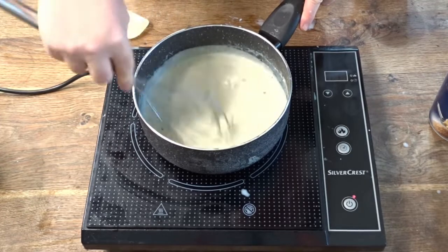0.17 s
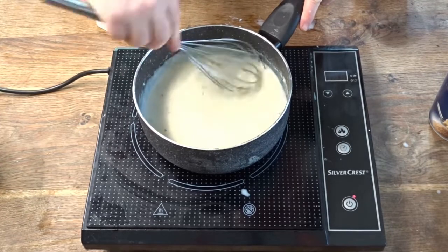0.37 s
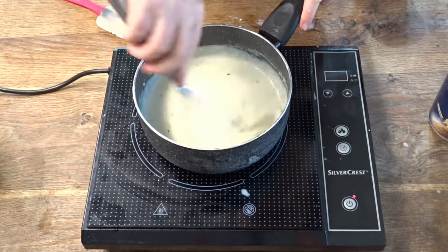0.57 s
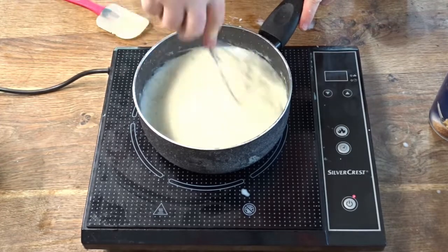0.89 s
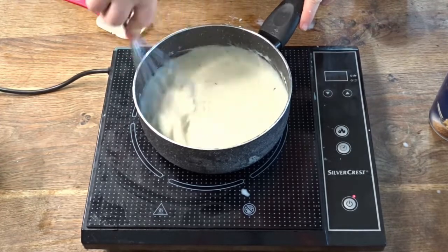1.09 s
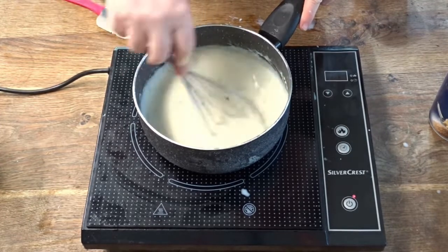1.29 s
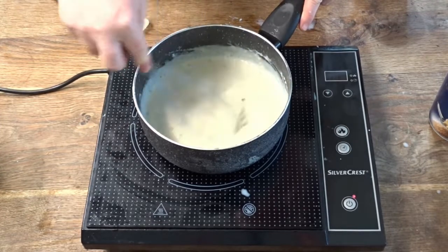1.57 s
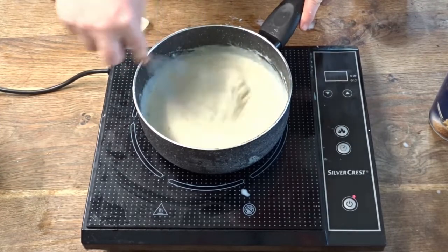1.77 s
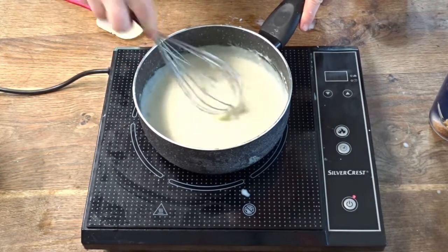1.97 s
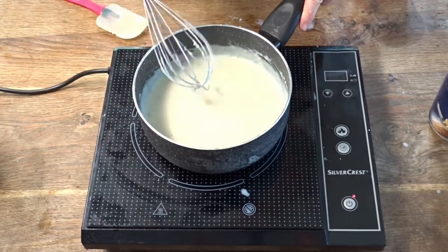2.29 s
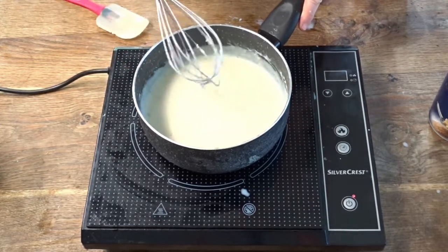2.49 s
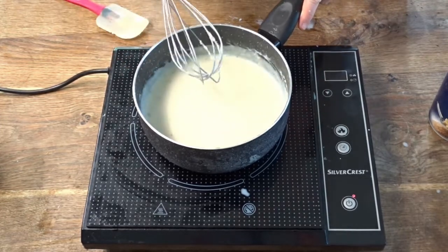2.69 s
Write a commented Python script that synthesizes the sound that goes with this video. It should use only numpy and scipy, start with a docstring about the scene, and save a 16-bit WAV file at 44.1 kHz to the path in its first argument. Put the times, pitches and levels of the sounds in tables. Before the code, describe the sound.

A wire whisk stirs thick sauce in a small saucepan: light strokes, a hard scrape with soft glugs, then quick strokes. It lifts out and taps the rim three times, close by, over a faint kitchen hob hum.

```python
"""Over the hum of a hob, a wire whisk stirs thick sauce in a small saucepan. Light strokes come first,
then a hard scrape round the wall with the sauce glugging, then quick strokes, with the odd knock on the
rim. Each stroke is a run of tiny slips that ring the pan and the wires. The whisk lifts out, singing
faintly, and taps the rim three times. The kitchen adds a short tail throughout."""
import sys
import numpy as np
from scipy import signal
from scipy.fft import rfft, irfft
from scipy.io import wavfile
from scipy.ndimage import map_coordinates

SR = 44100
rng = np.random.default_rng(int(sys.argv[2]) if len(sys.argv) > 2 else 0)


def master_out(mix):
    """Clip the mix to full scale and print it as 16-bit PCM to the path in sys.argv[1]."""
    frames = np.transpose(np.atleast_2d(mix))
    ceiling = np.clip(frames, -1, 1)
    pcm = np.round(ceiling * 32767).astype(np.int16)
    wavfile.write(sys.argv[1], SR, pcm)


N = 125685
T = np.arange(N) / SR

# bed of hob fan and room tone: f/Hz, level/dB
FAN_EQ = [(20, -21), (45, -15), (70, -2.5), (140, -5), (210, -3), (400, -3), (680, -4), (1000, -7),
          (1300, -9.5), (1750, -15), (2100, -4), (2600, -16.5), (4200, -17), (8000, -22), (11000, -24.5),
          (15500, -30)]
# light strokes: peak t/s, rise/s, fall/s, pan level/dB, rasp level/dB, wire level/dB
LIGHT_STROKES = [(.052, 0.11, 0.024, -29.5, -36.5, -39), (0.152, 0.015, 0.0066, -20.5, -35, -42),
                 (0.173, 0.042, 0.023, -45, -30, -33.5), (.258, 0.019, 0.031, -30, -31, -45),
                 (0.304, 0.02, 0.015, -31, -30, -37), (0.385, 0.0058, 0.0041, -38.5, -39, -38),
                 (1.352, .035, 0.028, -33, -39, -42), (1.39, 0.011, 0.0029, -32.5, -34, -35.5),
                 (1.49, 0.038, 0.017, -27.5, -33.5, -40.5), (1.596, 0.027, 0.019, -29, -37, -34.5),
                 (1.693, 0.034, 0.031, -28.5, -28, -39), (1.795, 0.023, 0.018, -25, -29, -32),
                 (1.887, 0.027, 0.023, -28, -35.5, -36), (1.96, .03, 0.1, -51, -55.5, -60)]
# hard scrape round the wall: t/s, pan level/dB, rasp level/dB, wire level/dB
WALL_SCRAPE = [(0.446, -78, -64, -53), (0.457, -41.5, -41, -33), (0.494, -35.5, -41, -42),
               (0.518, -51, -35, -37), (.546, -37, -30.5, -29), (.551, -33, -27, -23),
               (.59, -23, -28.5, -24), (0.628, -31, -30, -19.5), (0.684, -31.5, -32, -21),
               (.72, -31, -27.5, -22.5), (0.788, -33, -24.5, -25), (.846, -33, -51, -31),
               (0.87, -58, -35, -38), (0.891, -31, -28, -17.5), (0.916, -38, -43, -36.5),
               (0.999, -30.5, -38, -30.5), (1.04, -31, -35, -38), (1.083, -39, -59, -48),
               (1.122, -23.5, -29, -30), (1.146, -21, -22.5, -22.5), (1.17, -26.5, -21.5, -31.5),
               (1.199, -23, -24, -29), (1.214, -74, -42, -50), (1.275, -36, -32, -36.5),
               (1.34, -39, -48, -50)]
# pan body, dry rasp and bright wires under the slips: f/Hz, level/dB
PAN_EQ = [(100, -65), (230, -12), (310, -15), (380, -7.5), (470, -9.5), (620, -8), (770, -2), (900, -2),
          (1030, -1), (1200, 4), (1400, 2), (1560, 1), (1750, 3), (2050, -7), (2700, -3.5), (5000, -19),
          (16000, -88.5)]
RASP_EQ = [(300, -29), (1200, -15.5), (2000, -1), (2800, 1.5), (4400, -3.5), (5200, -1.5), (6200, -3.5),
           (7200, 3.5), (9000, -8.5), (10500, -11.5), (13000, -13.5), (15800, -24.5)]
WIRE_EQ = [(1000, -50), (4700, -1.5), (5100, -16), (5300, -10), (5560, -4.5), (5900, -15.5), (6800, -10.5),
           (7500, -5.5), (8000, 3), (8400, -3.5), (9100, -2), (9900, -10.5), (12000, -20), (15800, -20.5)]
# the pan's hollow ring, moving with where the wires touch: t/s, f/Hz, level/dB on the pan envelope
HOLLOW_PATH = [(.05, 1530, -8.5), (.156, 1518, 2.5), (.25, 1550, 1), (.31, 1770, -5), (.39, 1500, -2),
               (.5, 1490, -18), (.6, 1200, -11.5), (.7, 1240, -49), (.81, 1580, -9), (.98, 1046, -22),
               (1.045, 1510, -6), (1.1, 1530, -21), (1.19, 1500, 1.5), (1.35, 1554, -6.5),
               (1.49, 1330, -14), (1.6, 1270, -18), (1.7, 1450, -5.5), (1.8, 1320, -29), (1.9, 1560, -9.5)]
# the wires' ring, moving as they bend: t/s, f/Hz
BEND_PATH = [(.45, 8500), (.6, 8460), (.68, 8500), (.78, 7900), (.89, 8230), (1.0, 7800), (1.15, 7960),
             (1.6, 7700), (1.8, 8530)]
# ringing modes of whisk and pan: f/Hz, level/dB, t60/s
WHISK_PARTIALS = [(2980, -15, 0.4), (3530, -16, 0.29), (4350, -14, 0.38), (5100, -20, 0.54),
                  (5600, -17.5, 0.29), (6680, -15, 0.32), (6960, -21, .18), (7950, -4, .22),
                  (7930, -6, 0.3), (7980, -17.5, 0.065), (8240, -19, .18), (8775, 1, 0.087),
                  (9100, -25, .12), (10900, -30, 0.11)]
PAN_PARTIALS = [(377, -6.5, 0.053), (638, 10, 0.054), (930, 2.5, 0.16), (1237, -2, 0.14), (1584, 15, 0.079),
                (1730, 9, 0.09), (2168, 9, 0.03)]
# sauce spitting off the wires: f/Hz, level/dB
FIZZ_EQ = [(2000, -43), (7000, -7), (9500, -4), (11500, -3), (14000, 1), (15800, -2)]
# early reflections off worktop and walls: t/s, gain
REFLECTIONS = [(.0013, 0.19), (.0026, 0.15), (.0049, .26), (.0077, 0.13), (0.0138, 0.11), (0.0207, 0.17)]
# decay of the kitchen's tail: f/Hz, t60/s
TAIL_DECAY = [(200, 0.72), (700, 0.53), (1700, 0.34), (4600, 0.41), (8000, 0.28), (14000, 0.3)]
# side signal of the tail: f/Hz, level/dB
TAIL_SIDE_EQ = [(200, 0), (1000, -.5), (2500, .5), (4500, -4), (8000, 2), (12000, 1.5)]
# gulps of sauce: t/s, length/s, f/Hz, level/dB, bandwidth as a share of f
GULPS = [(0.441, 0.064, 411, -42.5, 0.034), (0.455, 0.11, 258.4, -44.5, 0.063),
         (0.553, .045, 367, -45, 0.064), (0.591, 0.06, 289, -43, 0.064), (.63, .07, 316, -60, .2),
         (.709, .013, 906, -23.5, 0.092), (0.73, 0.092, 771, -28, 0.25), (.745, 0.088, 577, -37, 0.21),
         (0.738, 0.0933, 388, -39, 0.16), (.815, 0.035, 389, -37.5, 0.051), (0.818, .1, 780, -36.5, 0.75),
         (0.882, .045, 265, -39, 0.14), (0.948, 0.055, 269, -44.5, 0.052), (1.002, 0.15, 342, -46.5, 0.74),
         (1.135, 0.11, 840, -32, .12), (1.122, 0.11, 392, -52, .15), (1.227, 0.08, 380, -45.5, .04)]
# rim hits and their rebounds: t/s, level/dB, ping f/Hz, pan trim/dB, struck wire f/Hz
RIM_HITS = [(.4514, -17.5, 8870, 5, 5100), (1.0916, 2, 8000, -5, 5570), (1.0981, -0.5, 7770, -19, 5570),
            (1.812, -16, 8550, -4, 5570), (2.3090, 0.5, 7830, -17, 5570), (2.3162, 0, 8000, 0, 5570),
            (2.577, -2.5, 8300, 4.5, 6690), (2.5848, -1.5, 8860, -4, 6690), (2.604, -4, 8200, -24, 6690),
            (2.64, -9, 7980, 6, 6690), (2.709, -4.5, 7870, 5, 7950)]
# a hit's attack, and its shimmer of many close wire modes: f/Hz, level/dB
CLICK_EQ = [(100, -43), (350, -6), (900, 0.5), (2500, -5.5), (5000, -4), (7000, 5), (9500, 8.5), (11500, 1),
            (15800, 8)]
SHIMMER_EQ = [(1000, -58), (6500, -9), (7500, -7), (7950, 2.5), (8400, -7), (9100, -9), (10000, -30),
              (15800, -44)]
# wires singing as they leave the sauce: t/s, length/s, f/Hz, level/dB
WIRE_TONES = [(2.0, 0.43, 3910, -66), (2.219, 0.042, 3880, -52), (2.232, .07, 6400, -50),
              (2.234, 0.068, 7900, -57), (2.259, .06, 3900, -59)]
# tick on the way out: f/Hz, level/dB
TICK_EQ = [(3000, -25), (8000, -5), (11000, 4), (15000, -9)]

FAN_DB, FAN_WIDTH, HUM_HZ, HUM_DB = -54.5, 0.45, 145.5, -67
SLIPS_PER_S, SLIP_SPREAD_DB, GRIT_PER_S, GRIT_SPREAD_DB, GRIT_SHARE = 420, 2.5, 3000, 3, 0.46
FLUTTER_DB, FLUTTER_S = 2, 0.012
PAN_DB, RASP_DB, WIRES_DB, SING_ALONG_DB, BEND_DB = -1, 1, 0.5, -13, -10.5
FIZZ_DB, FIZZ_PER_S, FIZZ_SPAN = -7, 1700, 0.74
SHIFT_DB, SHIFT_WIDTH_HZ, SHIFT_LIFE_S = 3, 229.6, 0.05913
TAIL_DB, TAIL_WIDTH, TAIL_ATTACK_S = -1, 0.33, 0.0024
CLICK_DB, PING_DB, STRUCK_WIRE_DB, WHISK_DB, SHIMMER_DB, KNOCK_DB = 6, 3.5, -8.5, -4.5, 0.5, -9
CONTACT_S, PING_T60, WIRE_T60, SHIMMER_T60 = 0.00097, 0.022, 0.17, 0.41
DETUNE, UNEVEN_DB = 0.0049, 3  # scatter of the whisk's partials from hit to hit
TICK_S, TICK_DB = 2.1615, -25.5


def amp(db):
    """Decibels to gain."""
    return 10 ** (np.asarray(db) / 20)


def unit_rms(x):
    """Scales to rms 1."""
    return x / np.sqrt(np.mean(abs(x) ** 2) + 1e-20)


def unit_energy(x):
    """Scales to energy 1."""
    return x / np.sqrt(np.sum(x ** 2) + 1e-20)


def at_hz(points, hz):
    """Reads a table on a log-frequency axis."""
    f, value = np.transpose(points)
    return np.interp(np.log(hz + 1), np.log(f + 1), value)


def automation(points, column, **ends):
    """One column of a timed table as a control curve at every sample."""
    curve = np.array(points)
    return np.interp(T, curve[:, 0], curve[:, column], **ends)


def add(mix, start_s, sound):
    """Drops a sound into the mix."""
    part = mix[round(start_s * SR):][:len(sound)]
    part += sound[:len(part)]


def colour(eq, size=4096):
    """Minimum-phase impulse response of an EQ curve, energy 1."""
    log_gain = np.log(amp(at_hz(eq, abs(np.fft.fftfreq(size, 1 / SR)))))
    spectrum = np.exp(np.conj(signal.hilbert(log_gain)))
    return unit_energy(np.fft.ifft(spectrum).real[:size // 2])


def ring(partials):
    """Struck metal as dying sines, energy 1."""
    t = T[:SR // 2]
    sines = (amp(db - 60 * t / t60) * np.sin(2 * np.pi * hz * t) for hz, db, t60 in partials)
    return unit_energy(sum(sines))


def excite(drive, response):
    """Plays a signal through an impulse response, keeping its length."""
    return signal.oaconvolve(drive, response)[:len(drive)]


def resonate(x, hz, width_hz):
    """A steep resonance that follows the curve hz, rms 1."""
    carrier = np.exp(2j * np.pi * np.cumsum(hz) / SR)
    r = np.exp(-np.pi * width_hz / SR)
    return unit_rms((carrier * signal.lfilter([1], [1, -2 * r, r * r], x / carrier)).real)


def hob():
    """The bed: steady fan noise and a low, slightly unsteady hum."""
    shape = amp(at_hz(FAN_EQ, np.fft.rfftfreq(N, 1 / SR)))
    mid, side = unit_rms(irfft(rfft(rng.standard_normal((2, N))) * shape, N))
    jittered_hz = HUM_HZ + 300 * rng.standard_normal(N)
    hum = amp(HUM_DB) * np.sin(2 * np.pi * np.cumsum(jittered_hz) / SR)
    return amp(FAN_DB) * np.array([mid + FAN_WIDTH * side, mid - FAN_WIDTH * side]) + hum


def slips(per_s, spread_db):
    """Stick and slip: unevenly spaced clicks of uneven size, rms 1."""
    gaps, strength, sign = rng.random((3, N // 4))
    at = (np.cumsum(0.2 + 1.6 * gaps) * SR / per_s).astype(int)
    level_db = spread_db * np.minimum(-np.log(1 - strength), 2.4)  # capped so no slip sticks out
    clicks = amp(level_db) * np.sign(sign - 0.5)
    return unit_rms(np.bincount(at[at < N], clicks[at < N], N))


def from_peak(peak, rise, fall):
    """Distance from a stroke's peak, counted in rise or fall times."""
    return np.maximum((peak - T) / rise, (T - peak) / fall)


def pressure(layer):
    """Contact envelope of layer 0 (pan), 1 (rasp) or 2 (wires): the scrape plus a swell per stroke."""
    power = amp(automation(WALL_SCRAPE, 1 + layer, left=-120, right=-120)) ** 2
    for peak, rise, fall, *levels in LIGHT_STROKES:
        power += amp(levels[layer]) ** 2 * np.exp(-1.4 * from_peak(peak, rise, fall) ** 1.82)
    return np.sqrt(power)


def stirring():
    """Wires stick and slip on the pan; the slips and finer grit ring the pan, rasp, and ring the wires."""
    coarse = np.sqrt(1 - GRIT_SHARE) * slips(SLIPS_PER_S, SLIP_SPREAD_DB)
    textures = []
    for steps in rng.standard_normal((3, 2000)):
        flutter = amp(FLUTTER_DB * np.interp(T / FLUTTER_S, np.arange(len(steps)), steps))
        grit = np.sqrt(GRIT_SHARE) * slips(GRIT_PER_S, GRIT_SPREAD_DB)
        textures.append(unit_rms(flutter * (coarse + grit)))
    pan_slips, rasp_slips, wire_slips = textures
    pan_env, rasp_env, wire_env = [pressure(layer) for layer in range(3)]
    body = amp(PAN_DB) * excite(pan_slips * pan_env, colour(PAN_EQ))
    rasp = amp(RASP_DB) * excite(rasp_slips * rasp_env, colour(RASP_EQ))
    wires = amp(WIRES_DB) * excite(wire_slips * wire_env, colour(WIRE_EQ))
    sing_along = amp(SING_ALONG_DB) * excite(wire_slips * wire_env, ring(WHISK_PARTIALS))
    hollow_env = amp(automation(HOLLOW_PATH, 2)) * pan_env
    hollow = hollow_env * resonate(pan_slips, automation(HOLLOW_PATH, 1), width_hz=210)
    bend = amp(BEND_DB) * wire_env * resonate(wire_slips, automation(BEND_PATH, 1), width_hz=610)
    return body + rasp + wires + sing_along + hollow + bend


def fizz():
    """Sauce spits off the wires: fine wet crackle at the fastest part of each light stroke."""
    swell = sum(amp(rasp_db) * np.exp(-1.4 * (from_peak(peak, rise, fall) / FIZZ_SPAN) ** 2)
                for peak, rise, fall, _, rasp_db, _ in LIGHT_STROKES)
    return amp(FIZZ_DB) * excite(swell * slips(FIZZ_PER_S, GRIT_SPREAD_DB), colour(FIZZ_EQ))


def shifting_contact(x):
    """Narrow resonances come and go as the contact passes from wire to wire."""
    hz, t, spectra = signal.stft(x, SR, nperseg=512, noverlap=384)
    grid = np.meshgrid(hz / SHIFT_WIDTH_HZ, t / SHIFT_LIFE_S, indexing="ij")
    ripple = map_coordinates(rng.standard_normal((300, 200)), grid, order=3, mode="wrap")
    depth_db = SHIFT_DB * np.clip(hz / 2500, 0, 1)[:, None]  # gentler in the lows
    gain = unit_rms(amp(depth_db * ripple))
    return signal.istft(spectra * gain, SR, nperseg=512, noverlap=384)[1][:N]


def kitchen(x):
    """Early reflections in the centre and a short diffuse tail that spreads in stereo."""
    size = SR // 2
    sparse_noise = rng.standard_normal((2, size)) * (rng.random((2, size)) < 4000 / SR)
    hz, t, spectra = signal.stft(sparse_noise, SR, nperseg=256)
    decay = amp(-60 * t / at_hz(TAIL_DECAY, hz)[:, None])
    tails = signal.istft(spectra * decay, SR, nperseg=256)[1][:, :size]
    fade_in = np.minimum(T[:size] / TAIL_ATTACK_S, 1)
    mid, side = [amp(TAIL_DB) * unit_energy(tail * fade_in) for tail in tails]
    side_gain = amp(at_hz(TAIL_SIDE_EQ, np.fft.rfftfreq(N, 1 / SR)))
    side = irfft(rfft(side, N) * side_gain, N)[:size]
    mid[0] += 1  # direct sound
    for delay, gain in REFLECTIONS:
        add(mid, delay, np.array([gain]))
    return np.array([excite(x, unit_energy(mid + way * TAIL_WIDTH * side)) for way in (1, -1)])


def sauce_glugs(glide=0.067):
    """Pockets of air open behind the whisk and ring with a wobbling, slightly rising pitch."""
    out = np.zeros(N)
    for start, length, hz, db, width in GULPS:
        progress = np.arange(0, 1, 1 / (length * SR))
        r = np.exp(-np.pi * width * hz / SR)
        real, imag = signal.lfilter([1], [1, -2 * r, r * r], rng.standard_normal((2, SR // 2)))
        wobble = (real + 1j * imag)[-len(progress):]
        wobble /= np.sqrt(abs(wobble))  # 2:1 compression
        cycles = np.cumsum(hz * (1 + glide * (progress - 0.5))) / SR
        tone = unit_rms((wobble * np.exp(2j * np.pi * cycles)).real)
        add(out, start, amp(db) * tone * np.sin(np.pi * progress ** 0.71))
    return out


def rim_taps():
    """Whisk on rim: a click and a short bright ping, then the wires shimmer and the damped pan rings on."""
    out, t = np.zeros(N), T[:SR // 2]
    for start, db, ping_hz, pan_db, wire_hz in RIM_HITS:
        scatter = rng.standard_normal((len(WHISK_PARTIALS), 2))
        partials = [(hz * (1 + DETUNE * sharper), level + UNEVEN_DB * louder, t60)
                    for (hz, level, t60), (louder, sharper) in zip(WHISK_PARTIALS, scatter)]
        wash = rng.standard_normal(len(t)) * amp(-60 * t / SHIMMER_T60)
        shimmer = amp(SHIMMER_DB) * unit_energy(excite(wash, colour(SHIMMER_EQ)))
        burst = rng.standard_normal(300) * np.exp(-t[:300] / CONTACT_S)
        click = amp(CLICK_DB) * unit_energy(np.convolve(burst, colour(CLICK_EQ)))
        ping = amp(PING_DB) * ring([(ping_hz, 0, PING_T60)])
        wire = amp(STRUCK_WIRE_DB) * ring([(wire_hz, 0, WIRE_T60)])
        whisk = amp(WHISK_DB) * ring(partials)
        knock = amp(KNOCK_DB + pan_db) * ring(PAN_PARTIALS)
        add(out, start, amp(db) * click)
        add(out, start, amp(db) * (ping + wire + whisk + shimmer + knock))
    return out


def lift_out():
    """The wires sing faintly as they leave the sauce, with one tiny tick."""
    out = np.zeros(N)
    add(out, TICK_S, amp(TICK_DB) * colour(TICK_EQ))
    for start, length, hz, db in WIRE_TONES:
        t = np.arange(0, length, 1 / SR)
        swell = np.sin(np.pi * np.sqrt(t / length))
        add(out, start, amp(db) * swell * np.sin(2 * np.pi * hz * t))
    return out


def scene():
    """Whisk, pan and sauce in the kitchen, a touch to the left, over the hob."""
    glugs = sauce_glugs()
    whisk = shifting_contact(stirring() + fizz()) + rim_taps() + lift_out()
    saucepan = kitchen(whisk + 0.62 * glugs) + 0.53 * glugs  # part of the glugging stays dry
    # a low cut keeps low thuds out of the whisk and glugs
    low_cut = signal.butter(3, 208, "high", fs=SR, output="sos")
    balance = amp([[0.1], [-0.1]])
    return signal.sosfilt(low_cut, saucepan) * balance + hob()


def record(dry):
    """A steep high cut takes off the very top."""
    high_cut = signal.firwin(511, 15900, window=("kaiser", 9), fs=SR)
    return signal.oaconvolve(dry, high_cut[None], "same")


dry = scene()
out = record(dry)
master_out(out)
```